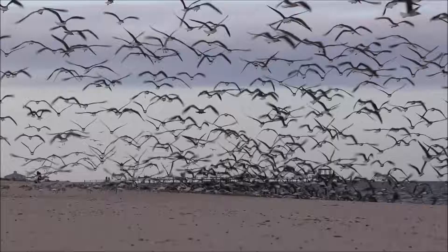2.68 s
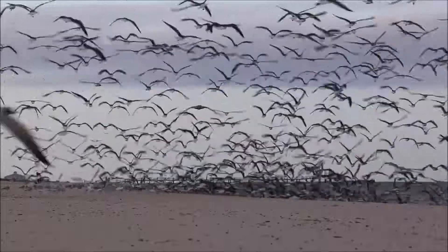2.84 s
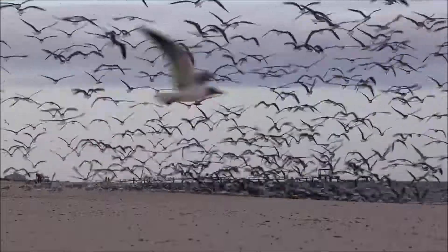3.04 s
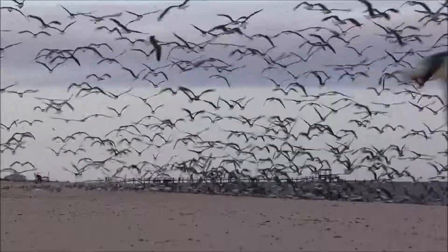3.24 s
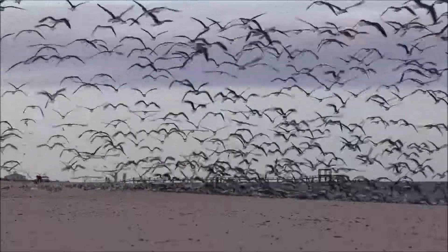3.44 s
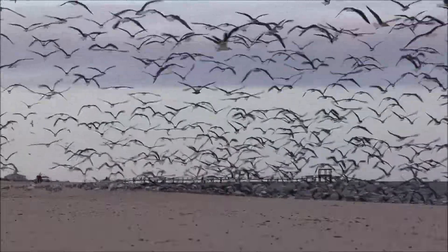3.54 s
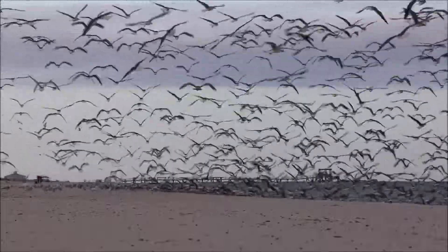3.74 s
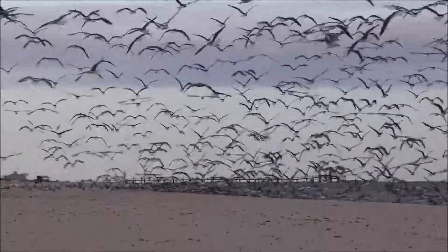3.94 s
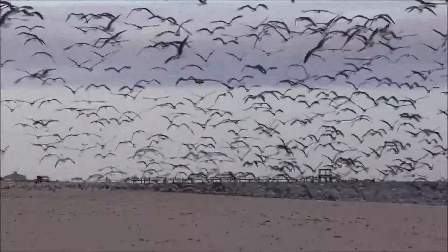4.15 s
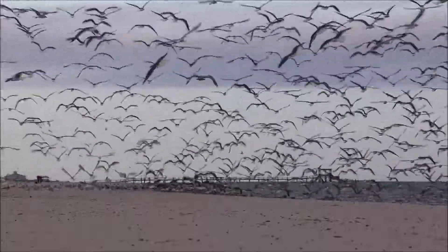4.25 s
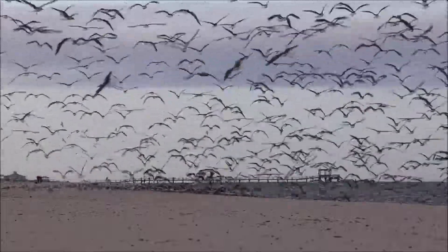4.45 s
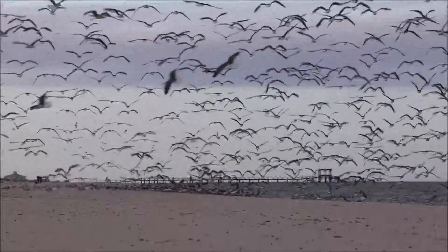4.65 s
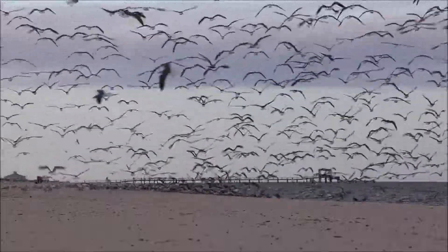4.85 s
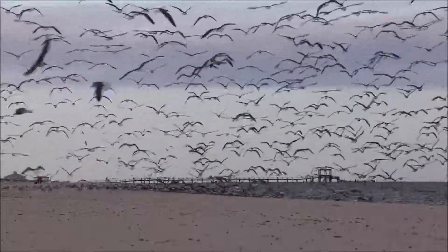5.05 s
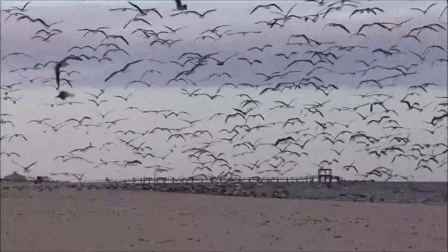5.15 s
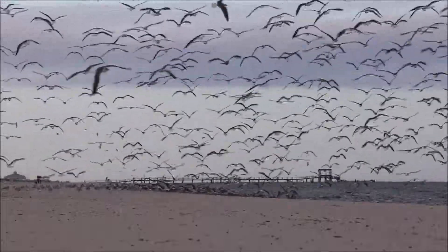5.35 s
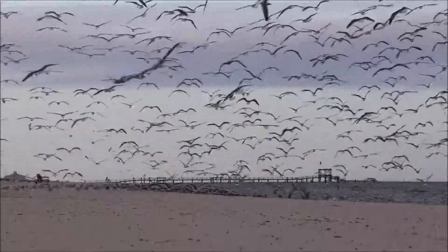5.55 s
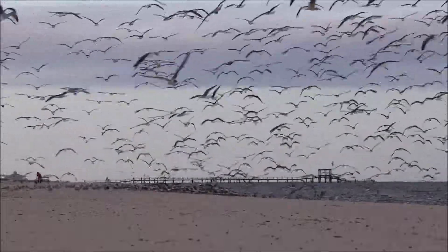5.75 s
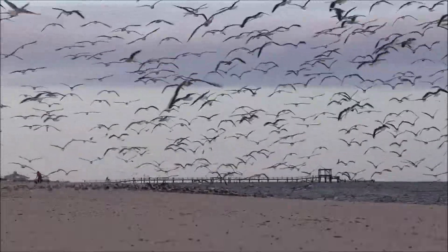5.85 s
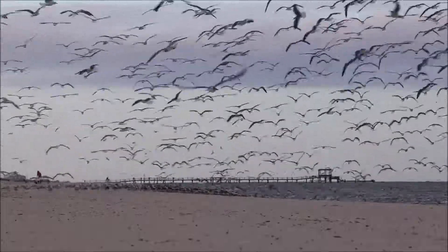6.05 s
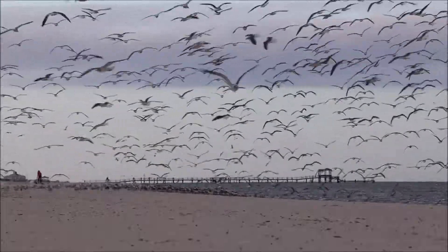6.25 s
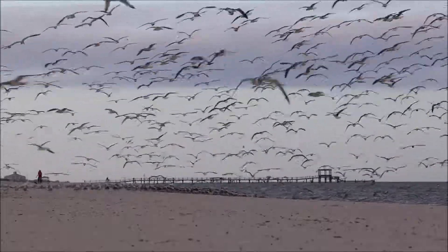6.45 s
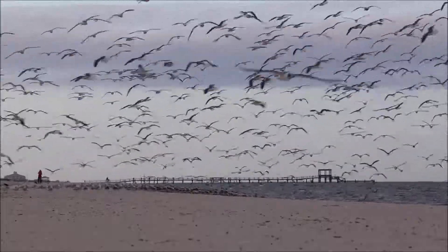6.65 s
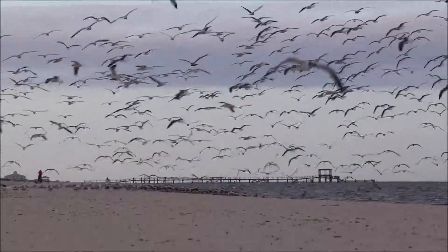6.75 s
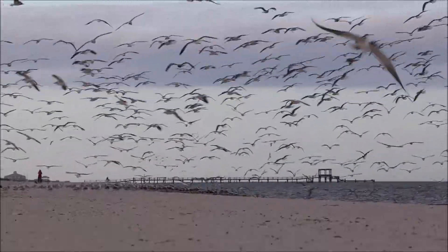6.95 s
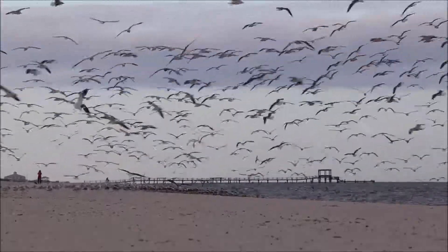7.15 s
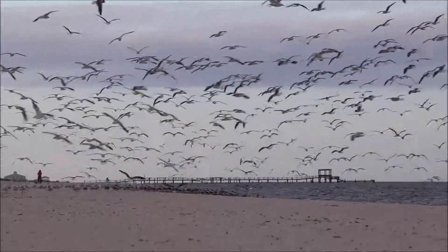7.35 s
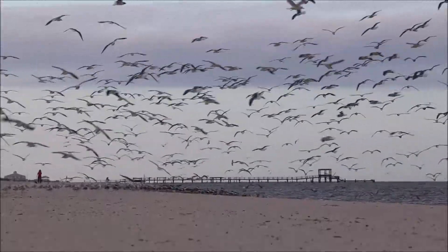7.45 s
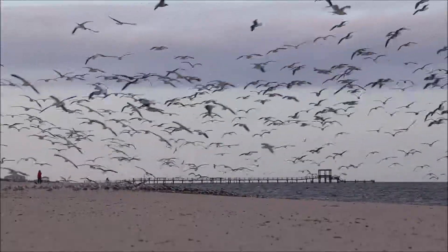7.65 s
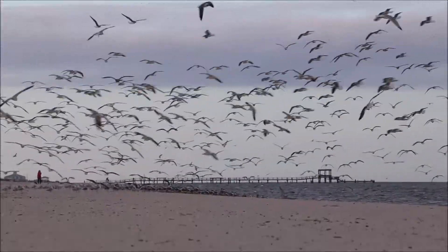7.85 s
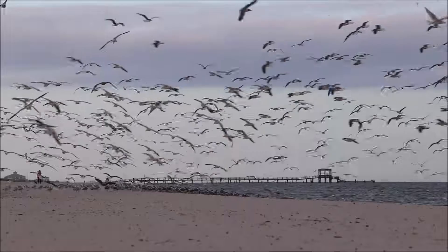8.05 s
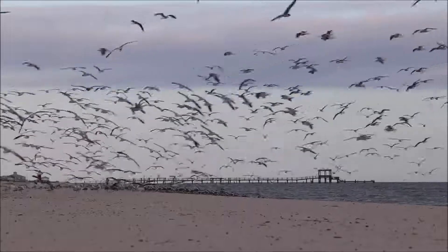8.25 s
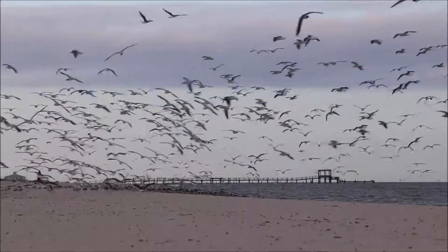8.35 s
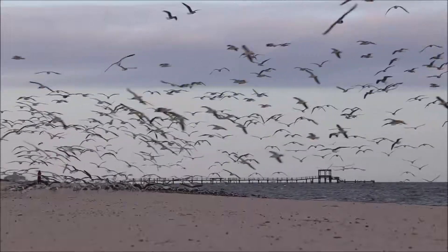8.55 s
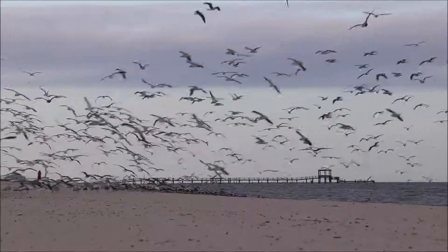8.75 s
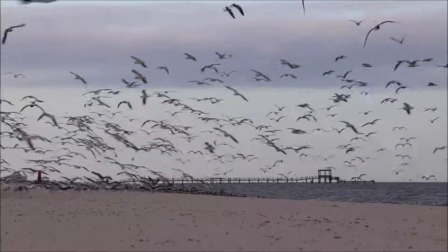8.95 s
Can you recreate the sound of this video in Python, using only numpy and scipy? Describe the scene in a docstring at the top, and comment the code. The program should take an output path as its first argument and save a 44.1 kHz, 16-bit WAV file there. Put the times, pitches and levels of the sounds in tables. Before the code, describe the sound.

Wind thumps and rumbles on the microphone as gulls take off from a beach, their calls thickening above small waves.

```python
"""Wind thumps and rumbles on the microphone; small waves wash the sand, with a few dry ticks.
A large flock of gulls lifts off the beach, calling more densely as it passes overhead.
Each voice is a vibrating membrane heard through the throat: one-arch yelps, two-note cries
(some hoarse) and, late on, long wails. Squawks are noise through the throat.
Far birds chatter behind, blurred by scatter off sand and water."""
import sys
import numpy as np
from scipy import signal
from scipy.fft import rfft, irfft
from scipy.io import wavfile
from scipy.ndimage import uniform_filter1d

SR = 44100
rng = np.random.default_rng(int(sys.argv[2]) if len(sys.argv) > 2 else 0)


def unload_audio(sound):
    """Save the sound as a 16-bit wav file, at the path given as the first command line argument."""
    columns = np.transpose(np.atleast_2d(sound))
    # keep every value between -1 and 1, then stretch to whole-number steps
    steps = np.round(np.clip(columns, -1, 1) * 32767)
    wavfile.write(sys.argv[1], SR, steps.astype(np.int16))


N = 396900
TIME = np.arange(N) / SR

# Levels are relative; the functions add their own gains.
# wind strength: t/s, buffet/dB, rumble/dB
WIND_LEVELS = [(0.0, -18.5, -33), (0.53, -14.5, -26), (1.06, -13, -26), (1.59, -16.5, -26.5),
               (2.12, -11, -22.5), (2.65, -14, -27.5), (3.18, -12.5, -27.5), (3.71, -17.5, -29.5),
               (4.24, -12.5, -26.0), (4.76, -12.5, -25.5), (5.29, -12, -24), (5.82, -13.5, -26.5),
               (6.35, -11.5, -23), (6.88, -11.5, -25), (7.41, -14.5, -22.5), (7.94, -12.5, -24),
               (8.47, -11, -25), (9.0, -12.5, -27)]
# strongest gusts: t/s, buffet boost/dB
GUST_PEAKS = [(.8, 4), (1.03, 6), (1.44, 6.5), (2.1, -0.5), (4.11, 6.5), (4.46, 4), (4.95, 7.5), (5.5, 2.5),
              (5.75, 7.5), (7.55, 6.5), (8.09, 2.5), (8.28, 4), (8.84, 4.5)]
# large and small eddies: f/Hz, level/dB
BUFFET_SPECTRUM = [(8.8, -26.5), (15, 0), (43, 3.5), (57, -4.5), (90, -24.5), (120, -51), (200, -120)]
RUMBLE_SPECTRUM = [(35, -11), (60, -0.5), (75, 3), (100, -3.5), (150, -9.5), (220, -16), (320, -23),
                   (500, -35.5), (1000, -70.5)]
# wave strength: t/s, wash/dB, fizz/dB
WAVE_LEVELS = [(0.05, -45.5, -70.5), (0.81, -46, -74), (0.98, -42.5, -70), (2.49, -46, -78),
               (2.74, -45.5, -73), (2.98, -43, -70.5), (3.55, -43.5, -71), (3.72, -39, -74),
               (3.8, -40, -71), (4.36, -46, -75.5), (7.59, -45, -73), (7.99, -46.5, -75),
               (8.26, -44.5, -80), (8.9, -47, -79)]
# water and foam: f/Hz, level/dB
WASH_SPECTRUM = [(100, -29.5), (300, 5), (500, 1), (800, -3), (1300, -4), (2200, -10), (3500, -15.5),
                 (5300, -22.5), (6500, -29.5), (9000, -37.5)]
FIZZ_SPECTRUM = [(2000, -16), (6000, -8), (8000, 8.5), (10000, 7), (13000, 0.5), (16000, 0.5)]
# short rasp of noise at the very start, then toneless squawks and rough call onsets:
# t/s, length/s, level/dB
RASP_BURSTS = [(-.02, 0.07, -38.5), (0.142, 0.051, -42), (0.191, 0.1, -44), (0.26, 0.11, -42.5),
               (0.415, 0.025, -40), (1.328, 0.072, -35), (2.655, 0.077, -49), (3.237, 0.046, -40),
               (4.139, 0.024, -41), (7.175, 0.044, -30.5), (7.803, 0.035, -44), (8.28, 0.06, -38)]
# rasp and squawk colour: f/Hz, level/dB
RASP_SPECTRUM = [(800, -34), (1500, -4), (2100, 3), (3000, 5), (3800, -1), (4800, -7), (6000, -24),
                 (8000, -48)]
# far flock: t/s, level/dB
FLOCK_LEVELS = [(0, -52), (1.2, -53), (1.9, -47.5), (3, -48), (4.5, -59.5), (5.4, -35.5), (6.2, -41),
                (7.3, -38), (8.4, -37.5), (9, -45)]
# response of throat and air: f/Hz, level/dB
THROAT_RESPONSE = [(700, -20.5), (950, -21.5), (1060, -25), (1400, 2), (1900, -5), (2400, -1), (2900, 0),
                   (3700, -4.5), (4700, -10), (5600, -19.5), (6500, -36.5), (8000, -59.5), (12000, -68)]
# yelps: top t/s, rise/s, fall/s, top f/Hz, scoop/fraction, drop/fraction, level/dB, tilt/(dB/oct)
YELP_CALLS = [ (.148, 0.038, 0.024, 918, .15, 0.18, -39.5, -2),
              (.725, 0.039, .036, 714, 0.43, 0.4, -44, -2), (1.731, .03, 0.034, 906, 0.018, .02, -50, 5),
              (2.086, 0.065, 0.024, 1055, .07, 0.027, -51.5, 13.5),
              (3.098, 0.085, 0.056, 1012, 0.047, 0.061, -56, 20),
              (3.266, .02, 0.054, 912, 0.19, 0.3, -33.5, -5),
              (3.395, 0.038, 0.043, 789, 0.11, 0.21, -45, -4),
              (3.555, 0.023, 0.055, 1055, 0.163, .34, -26.5, -9.5),
              (3.675, 0.066, 0.087, 874, 0.12, 0.19, -38.5, -8.5),
              (3.71, 0.048, 0.035, 764, 0.05, 0.057, -41, 0), (3.801, 0.058, 0.041, 900, .17, 0.25, -38, 2),
              (4.021, 0.09, 0.037, 931, 0.36, 0.32, -38.5, -3),
              (4.045, .03, .045, 1167, .14, 0.24, -41, 12),
              (4.222, 0.064, 0.038, 945, .21, 0.39, -38, -9.5),
              (4.425, 0.036, 0.039, 959, 0.1, 0.16, -32, -2),
              (4.43, 0.081, 0.026, 944, .17, 0.15, -35, -3.5),
              (4.598, 0.054, 0.043, 892, .16, 0.35, -36.5, 0),
              (4.591, 0.063, 0.033, 973, 0.41, 0.11, -42, -4),
              (4.64, 0.031, 0.038, 904, 0.039, 0.17, -39, -4),
              (4.883, .104, 0.085, 944, 0.17, 0.22, -35.5, -8.5),
              (5.04, 0.083, 0.089, 905, .18, 0.26, -40, 3),
              (5.065, 0.042, 0.053, 1060, 0.19, 0.29, -38, -13),
              (5.055, .025, .06, 1180, 0.033, .28, -47, 1), (5.18, 0.1, 0.14, 942, .18, 0.12, -38, -6),
              (5.178, 0.067, 0.096, 1010, 0.17, 0.1, -36, -3),
              (5.311, 0.076, 0.047, 1012, 0.28, 0.2, -33, -6.5),
              (5.309, 0.043, .055, 786, 0.078, 0.073, -43.5, -6),
              (5.399, 0.063, 0.058, 834, 0.11, 0.33, -42.5, -10),
              (5.402, 0.033, 0.053, 1220, .24, 0.36, -33.5, -2),
              (5.529, 0.038, 0.031, 928, .23, .17, -31, -1),
              (5.863, 0.12, 0.074, 923, 0.18, 0.12, -36.5, -5.5),
              (5.818, 0.03, .053, 1114, 0.17, .36, -41, -15.5),
              (5.94, 0.06, 0.091, 1063, .15, .23, -38, 8.5),
              (6.052, 0.082, 0.077, 934, .2, 0.13, -37.5, -4),
              (6.078, 0.042, 0.065, 1080, .15, 0.16, -36, -10),
              (6.086, 0.027, 0.054, 1000, 0.22, 0.4, -34, -5),
              (6.205, 0.099, .07, 923, 0.16, 0.076, -31.5, -4.5),
              (6.256, 0.11, 0.097, 1054, 0.12, 0.31, -33, -0.5),
              (6.362, 0.11, .058, 1030, 0.25, 0.26, -31.5, -5),
              (6.41, 0.014, 0.025, 1050, 0.16, 0.13, -45, -3),
              (6.567, 0.065, 0.042, 924, 0.2, 0.15, -38, 6), (6.71, 0.1, 0.15, 1022, .06, 0.17, -35.5, -7),
              (6.626, 0.027, 0.043, 1134, .12, .21, -39, 2), (6.813, 0.039, .036, 908, .2, .3, -32, -1),
              (6.863, .032, 0.027, 1190, 0.37, 0.23, -34, -3),
              (6.88, 0.018, .042, 806, 0.036, 0.087, -38, -7),
              (6.922, .012, .045, 905, 0.036, .13, -35, -5),
              (7.072, 0.055, 0.046, 909, .18, 0.23, -32, 1.5),
              (7.121, 0.029, 0.043, 1170, 0.24, 0.42, -31.5, -5),
              (7.143, 0.055, 0.062, 890, .22, 0.23, -44, 6), (7.338, .072, 0.06, 934, 0.21, .13, -33.5, -1),
              (7.378, .036, 0.051, 1131, .28, 0.42, -31, -6.5),
              (7.503, 0.059, .035, 945, 0.21, 0.051, -39.5, -10),
              (7.74, 0.17, 0.11, 934, .07, 0.032, -35.5, -6.5),
              (7.895, 0.088, 0.065, 953, 0.16, 0.081, -36, -9),
              (7.946, 0.054, 0.089, 912, .06, .17, -37, -3),
              (8.081, 0.055, 0.046, 931, 0.085, .08, -38.5, -10),
              (8.133, 0.02, 0.036, 1100, 0.2, 0.27, -46, -19),
              (8.172, .014, 0.052, 1040, 0.036, .12, -36, -4),
              (8.279, 0.07, 0.05, 972, 0.2, 0.08, -35.5, -8), (8.46, 0.25, 0.15, 970, 0.12, 0.17, -35, -5),
              (8.615, 0.089, .08, 1049, .08, 0.29, -37, -13), (8.597, .045, 0.09, 997, .2, 0.26, -44, -9),
              (8.711, 0.021, .048, 1000, 0.14, 0.24, -45, -13),
              (8.897, 0.017, 0.023, 1104, .08, 0.33, -34.5, -7), ]
# light ticks: t/s, level/dB
TICK_HITS = [(0.334, -40.5), (1.04, -41), (1.375, -45), (2.355, -47), (2.96, -54), (3.77, -44)]
# tick colour: f/Hz, level/dB
TICK_SPECTRUM = [(1000, -14), (3000, -12), (5200, 16), (7000, -10), (12000, -11), (16000, -26)]
# two-note cries: t/s; flick, dip, crest delay/s; length/s; flick, dip, crest f/Hz; flick, crest level/dB;
# flick, crest tilt/(dB/oct); half-pitch tones/dB; overtones/dB; fundamental lift at crest/dB
CRY_CALLS = [ (0.415, 0.035, 0.11, .203, .265, 919, 800, 960, -30, -32, 2, 4, -13, -33, 16),
             (1.302, 0.019, .13, 0.24, 0.32, 1054, 836, 1071, -31, -37, -13, -9.5, -37, -38, 16),
             (1.347, .022, 0.098, .12, 0.13, 965, 815, 825, -28, -37, -6, 2, -20, -27, -2),
             (2.29, 0.0154, .088, 0.19, .262, 985, 702, 907, -34, -41, -0.5, -1.5, -30, -36, 6),
             (2.653, 0.024, 0.092, 0.19, 0.26, 1050, 846, 980, -33, -39.5, -1, 10.5, -18, -27, 0),
             (2.665, 0.031, 0.067, .16, 0.21, 978, 825, 966, -34, -39, -4, -10, -29, -35, -2),
             (4.147, 0.02, 0.063, .158, 0.21, 982, 825, 928, -33.5, -36, 1, 5, -12, -20, 0),
             (4.448, 0.0124, 0.052, 0.16, .205, 800, 771, 955, -42, -40, 3, 3.5, -25, -28, 0),
             (5.363, .024, .096, .158, 0.23, 1138, 877, 1030, -28, -33, -7, -10, -38, -39, 2),
             (5.538, 0.015, .078, .158, .202, 1144, 884, 982, -29.5, -35, -8, -8, -30, -38, 2),
             (7.184, 0.037, 0.078, 0.14, .23, 1082, 754, 797, -29.5, -41, -10, -10.5, -20, 0.5, 4),
             (7.817, 0.019, 0.084, 0.16, .23, 1069, 864, 1017, -32.5, -33.5, -10.5, -10.5, -27, -2.5, 1),
             (8.288, 0.033, 0.079, 0.18, 0.27, 1070, 727, 867, -37, -37, -9.5, -11, -31, -8, 0), ]
# top overtones, which carry only from overhead: f/Hz, level/dB
OVERTONE_SPECTRUM = [(3500, -49), (5100, -9), (6300, -17), (7300, -20.5), (9000, -29.5), (11500, -38),
                     (13500, -56)]
# wails, one curve each: t/s, f/Hz, level/dB
WAIL_CURVES = [
    [(6.48, 867.6, -43), (6.516, 933.7, -42), (6.542, 897.6, -32), (6.562, 942, -30.5), (6.638, 976, -33.5),
     (6.774, 955, -31), (6.86, 918, -39)],
    [(7.0, 845, -40), (7.034, 890, -39), (7.12, 970, -34), (7.236, 961, -31.5), (7.322, 937, -34.5),
     (7.358, 978, -35), (7.37, 1020, -41)],
    [(7.53, 840, -46), (7.546, 830, -33.5), (7.57, 887.9, -35.5), (7.628, 958.5, -29), (7.71, 989, -32),
     (7.83, 959.3, -34), (7.862, 950, -39), (7.9, 867.3, -38)],
    [(8.66, 858, -46), (8.674, 924, -35), (8.7, 944.5, -35), (8.75, 968, -34), (8.828, 908, -35),
     (8.89, 910, -43.5), (8.94, 948, -37), (8.99, 950, -47)],
]
# wail harmonics, fundamental first: level/dB
WAIL_PARTIALS_DB = [-23.5, -2.5, 0.5, -10, -24.5, -34.5]


def gain_of(db):
    """Decibels to amplitude."""
    return 10 ** (np.asarray(db) / 20)


def unit_rms(x):
    """Scales to rms 1."""
    return x / np.sqrt(np.mean(x ** 2) + 1e-20)


def db_at(spectrum, hz):
    """Interpolates a spectrum on a log-frequency axis."""
    f, db = np.transpose(spectrum)
    return np.interp(np.log(hz + 1), np.log(f + 1), db)


def follow(rows, t=TIME):
    """A curve's columns at times t."""
    s, *columns = np.transpose(rows)
    return [np.interp(t, s, c) for c in columns]


def add(mix, start_s, sound):
    """Mixes a sound in at start_s."""
    part = mix[max(round(start_s * SR), 0):][:len(sound)]
    part += sound[:len(part)]


def noise(spectrum):
    """Shaped noise, rms 1."""
    shape = gain_of(db_at(spectrum, np.fft.rfftfreq(N, 1 / SR)))
    return unit_rms(irfft(rfft(rng.standard_normal(N)) * shape, N))


def waver(t, rate_hz):
    """Random line with rate_hz new values a second."""
    return np.interp((t - t[0]) * rate_hz, np.arange(2048), rng.standard_normal(2048))


def wind(buffet_gain_db=-1, rumble_gain_db=1, gust_db=2.5, flurry_db=1.5, thump_s=.036):
    """Large eddies thump the microphone; small ones rumble above them."""
    buffet_db, rumble_db = follow(WIND_LEVELS)
    thumps_db = sum(db * np.exp(-((TIME - s) / thump_s) ** 2) for s, db in GUST_PEAKS)
    eddies = noise(BUFFET_SPECTRUM)
    eddies /= np.sqrt(uniform_filter1d(eddies ** 2, size=5000) + 1e-6)  # flatten the envelope
    pressure = gain_of(buffet_db + buffet_gain_db + thumps_db + gust_db * waver(TIME, 12)) * eddies
    pressure += gain_of(rumble_db + rumble_gain_db + flurry_db * waver(TIME, 14)) * noise(RUMBLE_SPECTRUM)
    return pressure / (1 + (pressure / .85) ** 6) ** (1 / 6)  # soft clip


def surf(wash_gain_db=3, fizz_gain_db=4, churn_db=2):
    """Small waves swell and churn; foam fizzes on top."""
    wash_db, fizz_db = follow(WAVE_LEVELS)
    water = gain_of(wash_db + wash_gain_db + churn_db * waver(TIME, 40)) * noise(WASH_SPECTRUM)
    foam = gain_of(fizz_db + fizz_gain_db) * noise(FIZZ_SPECTRUM)
    return water + foam


def rasps():
    """A short opening rasp of noise, then squawks: a voice breaking briefly into chaos."""
    envelope = np.zeros(N)
    for start_s, length_s, db in RASP_BURSTS:
        envelope += gain_of(db) * np.sin(np.pi * np.clip((TIME - start_s) / length_s, 0, 1))
    return envelope * noise(RASP_SPECTRUM)


def syrinx(t, hz, jitter):
    """Phase of a vibrating membrane with trembling pitch."""
    return 2 * np.pi * (np.cumsum(hz * (1 + jitter * waver(t, 485))) / SR + rng.random())


def throat_db(hz, tilt_db_oct):
    """Level of a partial; a higher tilt makes the call brighter."""
    return db_at(THROAT_RESPONSE, hz) + tilt_db_oct * np.log2(np.clip(hz, 1200, 4500) / 2700)


def far_flock(count=150, tilt_db_oct=-3, spread_db=14):
    """Distant calls, one pitch arch each, denser as the flock rises."""
    mix = np.zeros(N)
    for turn, (when, length, pitch, size, skew) in enumerate(rng.random((count, 5))):
        t = np.arange(int((.06 + .12 * length ** 2) * SR)) / SR
        arch = np.sin(np.pi * (t / t[-1]) ** (.5 + .45 * skew)).clip(0)
        hz = (860 + 320 * pitch) * (.74 + .26 * arch)
        phase = syrinx(t, hz, jitter=.0061)
        voice = sum(gain_of(throat_db(k * hz, tilt_db_oct)) * np.cos(k * phase) for k in range(1, 8))
        start_s = ((turn + when) / count) ** .8 * N / SR
        add(mix, start_s, voice * np.sqrt(arch) * gain_of(spread_db * size))
    return unit_rms(mix) * gain_of(follow(FLOCK_LEVELS)[0])


def beach_scatter(x, t60_s=.23):
    """Sparse, decaying reflections off sand and water."""
    t = np.arange(SR // 2) / SR
    taps = rng.standard_normal(len(t)) * (rng.random(len(t)) < .05)
    taps *= gain_of(-60 * t / t60_s) * (t > .003)
    return signal.oaconvolve(x, taps / np.linalg.norm(taps))[:N]


def partial(k, phase):
    """Tone at k times the pitch, random phase offset."""
    return np.cos(k * phase + 2 * np.pi * rng.random())


def call_gate(t, attack_s=.012):
    """Soft start and stop of a call."""
    attack = np.sin(np.pi / 2 * np.minimum((t - t[0]) / attack_s, 1)) ** 2
    return attack * signal.windows.tukey(len(t), .08)


def yelp(top_s, rise_s, fall_s, top_hz, scoop, drop, db, tilt_db_oct, fade_db=2.16, flutter_db=2.35):
    """One arch of pitch and level; harmonics slide through the throat's resonances."""
    t = np.arange(-rise_s, fall_s, 1 / SR)
    rising = t < 0
    from_top = np.where(rising, -t / rise_s, t / fall_s)
    sag = .78 * from_top ** np.where(rising, 2, 1.8) + .22 * from_top ** 5.84  # round top, steep ends
    hz = top_hz * (1 - np.where(rising, scoop, drop) * sag)
    hz *= 1 + .01004 * waver(t, 40)
    level_db = db + np.where(rising, -6.5, -14) * from_top ** 3.43
    phase, voice = syrinx(t, hz, jitter=.0033), np.zeros(len(t))
    for k in range(1, 9):
        air_db = fade_db * waver(t, 22.7) + flutter_db * waver(t, 110)  # moving air, per harmonic
        bird_db = 3 * rng.uniform(-1.17, 1)
        voice += gain_of(level_db + throat_db(k * hz, tilt_db_oct) + air_db + bird_db) * partial(k, phase)
    return top_s - rise_s, voice * call_gate(t)


def ticks(decay_s=.0038):
    """Short dry snaps of noise."""
    envelope, t = np.zeros(N), np.arange(2000) / SR
    for start_s, db in TICK_HITS:
        add(envelope, start_s, gain_of(db) * np.exp(-t / decay_s))
    return envelope * noise(TICK_SPECTRUM)


def glide(t, times_s, values, climb=.75):
    """Eases between values; climb < 1 makes the second move come early."""
    knots = np.arange(len(times_s))
    step, progress = np.divmod(np.interp(t, np.sort(times_s), knots), 1)
    eased = np.sin(np.pi / 2 * progress ** np.where(step > 0, climb, 1)) ** 2
    return np.interp(step + eased, knots, values)


def cry(start_s, flick_s, dip_s, crest_s, length_s, flick_hz, dip_hz, crest_hz, flick_db, crest_db,
        flick_db_oct, crest_db_oct, half_db, overtone_db, lift_db, scoop=.2, drop=.4, flutter_db=3):
    """Flick, dip, broad second note. Hoarse birds alternate strong and weak cycles: half-pitch tones."""
    t, turns_s = np.arange(0, length_s, 1 / SR), [flick_s, dip_s, crest_s]
    opening = np.clip(1 - t / flick_s, 0, 1)
    closing = np.clip((t - crest_s) / (length_s - crest_s), 0, 1)
    hz = glide(t, turns_s, [flick_hz, dip_hz, crest_hz])
    hz *= 1 - scoop * opening ** 2 - drop * closing ** 2.8
    level_db = glide(t, turns_s, [flick_db, crest_db - 2.5, crest_db])
    level_db -= 12 * opening ** 2 + 15.5 * closing ** 2.23
    tilt_db_oct = glide(t, turns_s, [flick_db_oct, max(flick_db_oct, crest_db_oct), crest_db_oct])
    phase, voice = syrinx(t, hz, jitter=.0057), np.zeros(len(t))
    for halves in range(2, 32):
        k = halves / 2
        gain = gain_of(throat_db(k * hz, tilt_db_oct))
        gain += gain_of(db_at(OVERTONE_SPECTRUM, k * hz) + overtone_db)
        if k == 1:
            gain *= gain_of(glide(t, turns_s, [0, 0, lift_db]))
        voice += gain * gain_of(half_db * (halves % 2) + flutter_db * waver(t, 68)) * partial(k, phase)
    rasp = 1 + .14 * waver(t, 900)
    return start_s, gain_of(level_db) * voice * rasp * call_gate(t)


def wail(curve, fade_db=.5, flutter_db=1.7):
    """Long, steady, piercing call led by its third harmonic."""
    t = np.arange(curve[0][0], curve[-1][0], 1 / SR)
    hz, level_db = (uniform_filter1d(c, size=1200, mode="nearest") for c in follow(curve, t))
    phase, voice = syrinx(t, hz, jitter=.0034), np.zeros(len(t))
    for k, db in enumerate(WAIL_PARTIALS_DB, 1):
        air_db = -fade_db * waver(t, 17.6) + flutter_db * waver(t, 90)
        voice += gain_of(level_db + db + air_db) * partial(k, phase)
    return t[0], voice * signal.windows.tukey(len(t), .1)


def gulls(wail_gain_db=3, near_scatter_db=-20, far_scatter_db=-11):
    """Near birds almost dry, far ones blurred by scatter."""
    near, far = np.zeros(N), far_flock()
    for start_s, voice in [yelp(*row) for row in YELP_CALLS] + [cry(*row) for row in CRY_CALLS]:
        add(near, start_s, voice)
    for start_s, voice in map(wail, WAIL_CURVES):
        add(near, start_s, gain_of(wail_gain_db) * voice)
    return near + far + beach_scatter(gain_of(near_scatter_db) * near + gain_of(far_scatter_db) * far)


def scene():
    """Birds, wind, water and ticks at one microphone."""
    return (gulls() + rasps() + wind() + surf() + ticks())[None]


def record(dry, cutoff_hz=15700):
    """The recorder's band limit."""
    lowpass = signal.firwin(2047, cutoff_hz, window=("kaiser", 9), fs=SR)
    return signal.oaconvolve(dry, lowpass[None], "same")


dry = scene()
out = record(dry)
unload_audio(out)
```